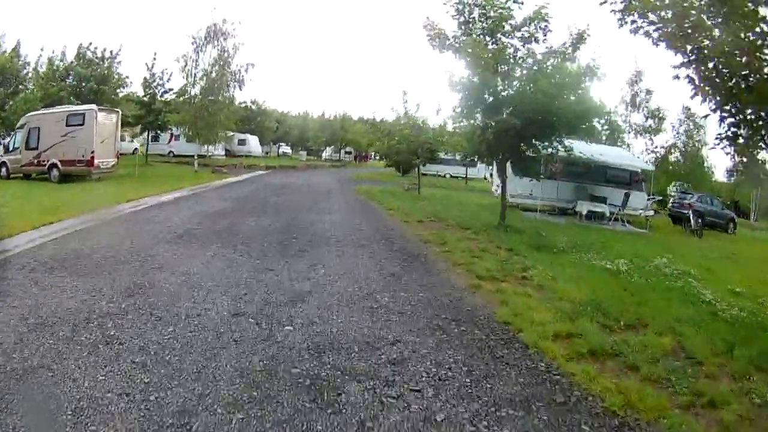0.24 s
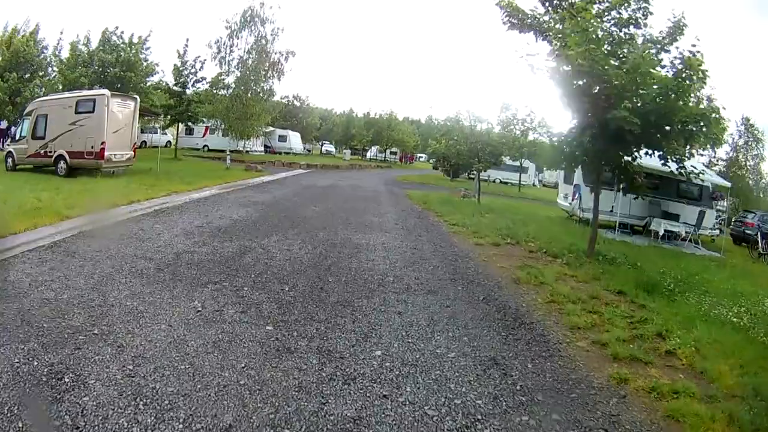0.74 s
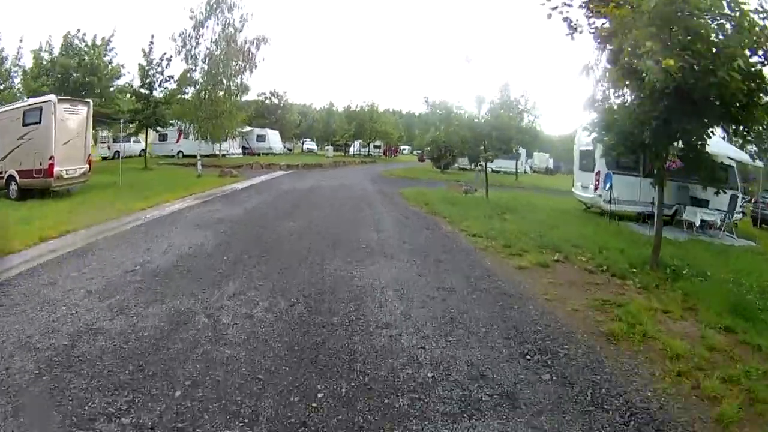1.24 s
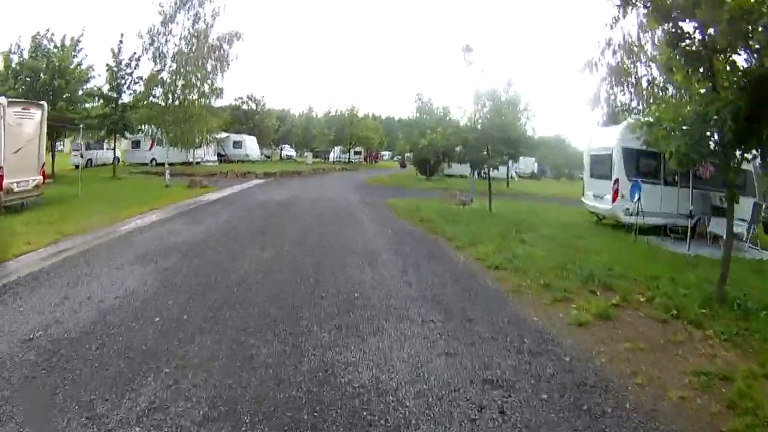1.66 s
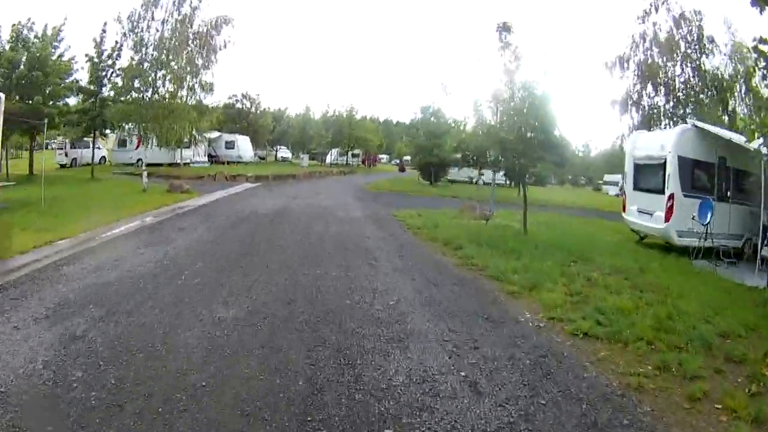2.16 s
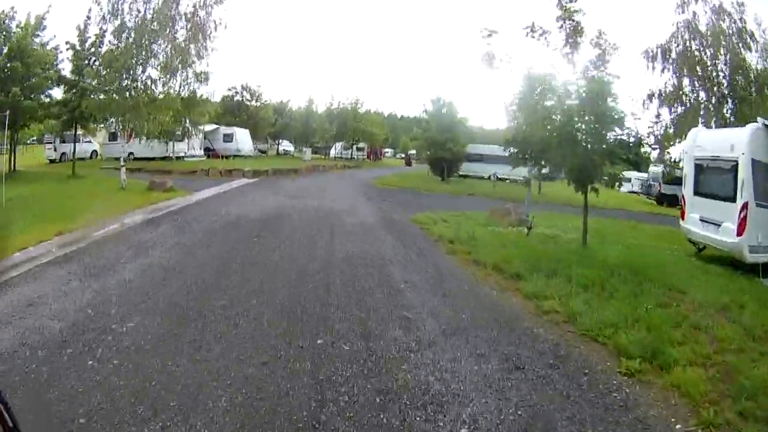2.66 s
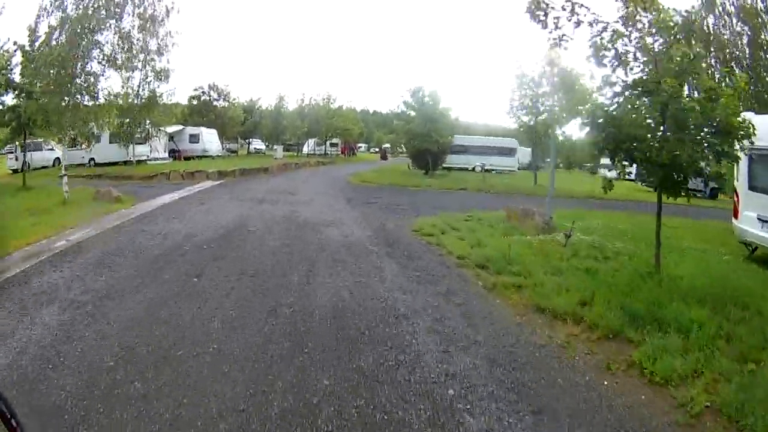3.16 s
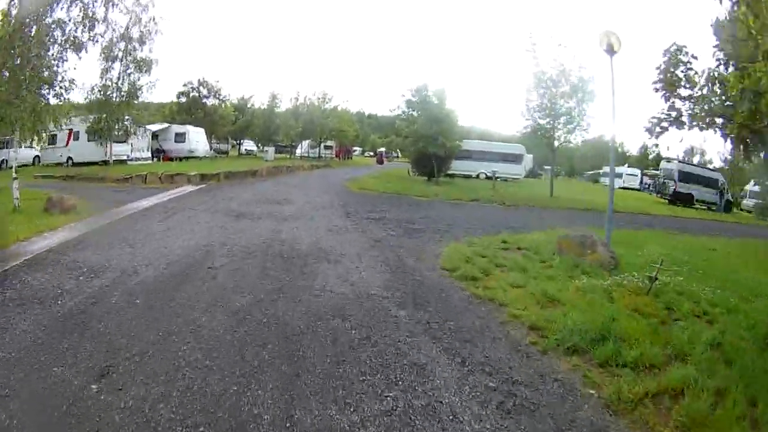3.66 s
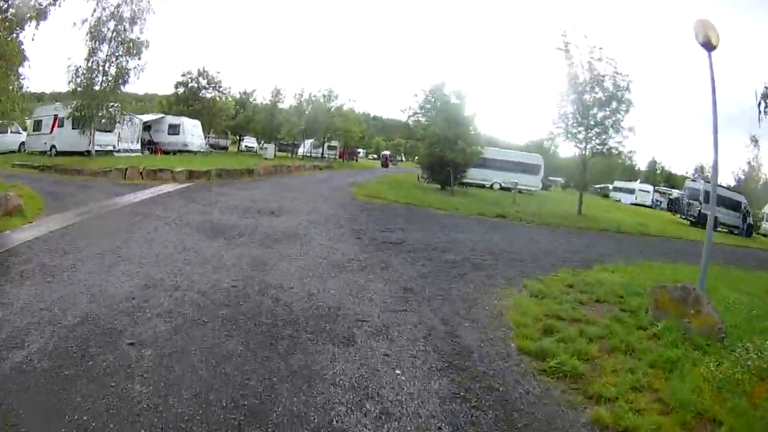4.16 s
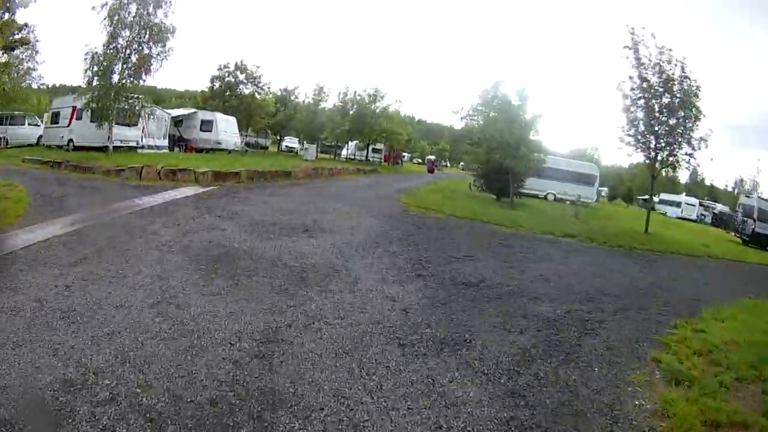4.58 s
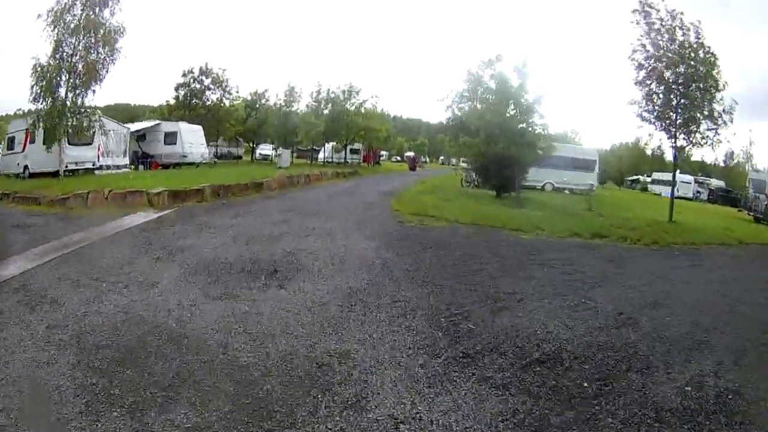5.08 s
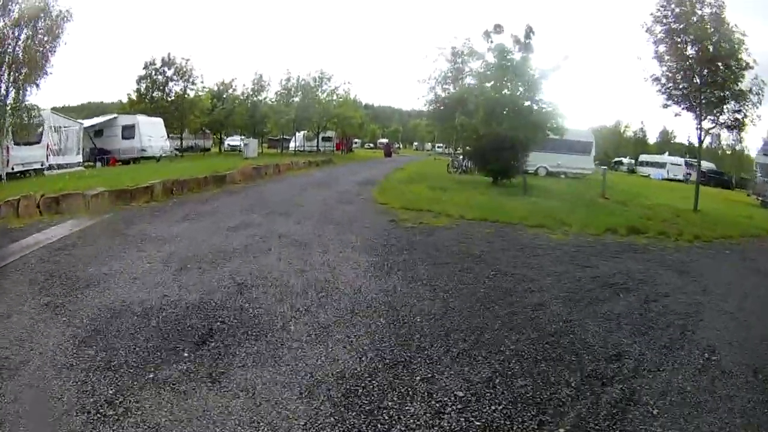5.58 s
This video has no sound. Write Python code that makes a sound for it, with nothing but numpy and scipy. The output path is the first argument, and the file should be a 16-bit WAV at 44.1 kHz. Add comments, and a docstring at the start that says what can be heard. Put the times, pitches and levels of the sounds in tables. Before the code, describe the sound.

Close, boxy rattling and knocking over a muffled gravel crunch as a bike rides along, with occasional stone pings and deep shuddering.

```python
"""A bicycle rolls along gravel for 5.8 s, heard through its frame by a camera in a closed housing on the handlebar.
From the start the tyres crunch as a dull, ringing rush (random grains through frame resonances), over a 31 Hz
flutter of the shaken camera (a bent sine) and faint hiss. Almost at once a stone pings (a scuff ringing the
wheel), as others do now and then. The mount's play ticks and knocks (short blows ringing the housing), densely
until about 2.9 s, sparsely up to 4.8 s, then densely again to the end."""
import sys
import numpy as np
from scipy.fft import rfft, irfft, next_fast_len
from scipy.io import wavfile
from scipy.ndimage import uniform_filter1d, map_coordinates

SR = 44100
rng = np.random.default_rng(int(sys.argv[2]) if len(sys.argv) > 2 else 0)


def waveform_to_disk(signal):
    """Save audio, clipped to [-1, 1], as 16-bit WAV at the path in sys.argv[1]."""
    frames = np.transpose(np.atleast_2d(signal))
    scaled = np.clip(frames, -1, 1) * 32767
    samples = np.round(scaled).astype(np.int16)
    wavfile.write(sys.argv[1], SR, samples)


N = 257103

SHAKE_HZ = 31.17  # nominal rate of the camera's swing
HARD_KNOCK_DB = 9.5  # reference strength for how dull a knock is and how strongly the other stop ticks


def amp(db):
    """Decibels to gain."""
    return 10 ** (np.asarray(db) / 20)


def unit(x):
    """x at rms 1."""
    return x / np.sqrt(np.mean(x ** 2) + 1e-20)


def along(points, hz):
    """(Hz, value) points read on a log frequency axis."""
    f, v = np.transpose(points)
    return np.interp(np.log(hz + 1), np.log(f), v)


def curves(rows):
    """One value per sample for each column after the time."""
    s, *cols = np.transpose(rows)
    return [np.interp(np.arange(N) / SR, s, c) for c in cols]


def wobble(rate):
    """A smooth random curve, rate knots a second."""
    knots = rng.standard_normal(int(N * rate / SR) + 4)
    return map_coordinates(knots, [np.arange(N) * rate / SR])


def filtered(x, response):
    """x times a response of frequency."""
    m = next_fast_len(len(x) + SR // 4)
    hz = np.fft.rfftfreq(m, 1 / SR)
    return irfft(rfft(x, m) * response(hz), m)[:len(x)]


def noise(spectrum):
    """Noise of rms 1 with the given colour."""
    return unit(filtered(rng.standard_normal(N), lambda hz: amp(along(spectrum, hz))))


def resonances(modes, hz):
    """Gain of a body whose resonances add in power; each falls to half amplitude at the edges of its width."""
    power = 0
    for centre, width, db in modes:
        power = power + (amp(db) / (1 + (2 * (hz - centre) / width) ** 2)) ** 2
    return np.sqrt(power)


def above(hz, edge_hz):
    """A smooth step from 0 below the edge to 1 above it."""
    return 1 - 1 / (1 + (hz / edge_hz) ** 4)


def add(track, s, sound):
    """Mix a sound into the track at time s."""
    start = max(round(s * SR), 0)
    track[start:start + len(sound)] += sound[:max(N - start, 0)]


def crunch(grain_rate, spread_db):
    """Countless small stones cracking under the tread at random, a few louder than the rest."""
    hit = rng.random(N) < grain_rate / SR
    loudness = amp(spread_db * np.minimum(rng.exponential(size=N), 4))
    return unit(hit * rng.standard_normal(N) * loudness)


def tyres(crunch_db, rumble_db, split_hz):
    """Gravel grains ring the frame; its low rumble and its higher crunch swell separately."""
    # tyres on the ground, before trims: t/s, crunch/dB, rumble/dB
    road = [(0, -41, -30.5), (.12, -40, -36), (.42, -41, -33.5), (.85, -40, -37.5), (1.05, -39, -34),
            (1.2, -37.5, -37.5), (1.45, -39, -35), (1.8, -37.5, -37.5), (1.95, -40.5, -41.5),
            (2.4, -37.7, -33), (2.56, -40.5, -37.5), (2.95, -40, -36.5), (3.5, -39, -38),
            (4.12, -39, -34.5), (4.53, -40, -38.5), (4.8, -37, -34), (5.05, -39.5, -33.5),
            (5.35, -37.5, -37), (5.83, -38, -32.5)]
    # resonances on the way from the tyres through frame and housing: f/Hz, width/Hz, level/dB
    frame_modes = [(253, 210, -7.5), (393.4, 106, 2), (464, 110, -9), (759, 130, -9.5), (974, 240, -14.5),
                   (1230, 310, -17), (1574, 174, -6), (1819, 233, -8.5), (2012, 166, -14), (2224, 190, -22),
                   (3440, 640, -36.5), (4150, 260, -40.5)]
    high_db, low_db = curves(road)
    grains = crunch(grain_rate=2500, spread_db=3.0) + 0.86 * rng.standard_normal(N)
    high = unit(filtered(grains, lambda hz: resonances(frame_modes, hz) * above(hz, split_hz)))
    low = unit(filtered(grains, lambda hz: resonances(frame_modes, hz) * (1 - above(hz, split_hz))))
    high_gain = amp(high_db + crunch_db + 1.36 * wobble(22.01))
    low_gain = amp(low_db + rumble_db + 1.6 * wobble(13))
    return high_gain * high + low_gain * low


def knocks():
    """Every knock of every bump as (s, energy dB, brightness dB, swing dB); harder ones are duller."""
    # bumps that throw the mount against its stop once a swing, before trims: t/s, knocks, gap/s,
    # first knock/dB, change over the run/dB, brightness/dB, extra swing/dB
    bumps = [(0.0821, 3, 0.036, 11.5, -3.5, 1, 1), (.231, 2, 0.032, 11.3, -4.5, -0.2, -2),
             (0.379, 3, 0.037, 9, -0.5, -.8, -0.5), (.537, 3, 0.034, 6.5, 2.5, -0.5, 1),
             (.8326, 3, 0.032, 10.5, -3.5, 2, -1.5), (.935, 1, 0, 9.3, -1, -1.5, 1),
             (1.0544, 2, 0.033, 9.5, 2.6, 2, 1), (1.1234, 2, .0303, 12.5, -.5, .4, -.5),
             (1.2096, 1, 0, 1, 0, 0.5, 5), (1.2466, 2, 0.032, 11.5, -3.5, -.3, 0),
             (1.3925, 1, 0, 8.5, 0, -2.5, -2.5), (1.4724, 2, 0.039, 10, 2.5, 0.1, -1),
             (1.5383, 1, 0, -.9, 0, -5, 1), (1.5777, 3, 0.032, 8.5, 5.5, 2, 0.6),
             (1.6782, 2, 0.034, 11, -3, 1, 0.5), (1.7856, 1, 0, 7.5, 0, 1.3, -.5),
             (1.8403, 2, 0.032, 9, -7.5, 2.5, 0), (1.977, 1, 0, 8.5, 0, -1.5, -2.5),
             (2.085, 2, 0.031, -6.5, 8, 1, 7.5), (2.174, 2, 0.034, 13.1, -5, 0.3, -1.5),
             (2.2475, 2, 0.037, 5.5, -2, 0.5, 1), (2.3487, 3, 0.04, 9, 3, 1.3, 0),
             (2.4612, 2, 0.034, 10, -1, 2, -2), (2.5313, 3, .0365, 10, 3.7, 2.2, -1),
             (2.6419, 3, 0.035, 11, -2, 1.5, -0.5), (2.7397, 1, 0, 1.5, 0, .6, 0),
             (2.777, 2, 0.034, 1, -0.2, -0.8, 4), (2.9072, 1, 0, 5, 0, 0.5, -0.5),
             (3.1807, 2, 0.034, 8.5, -11.5, 1.3, 1), (3.9897, 1, 0, 10, 0, -1, 0),
             (4.1121, 1, 0, 2, 1, -4, -1), (4.2301, 2, .0313, 9, 1.5, 1.6, -1),
             (4.3142, 1, 0, 5, 0, 2.5, -1), (4.8143, 1, 0, 9.5, 0, 3, -4.5),
             (4.873, 2, .0405, 13, -1.2, -0.7, 0), (4.9498, 2, .028, 12.5, -12, 0.5, 0),
             (5.0484, 1, 0, 5.2, -1, 3.3, 1.5), (5.134, 3, 0.033, 11.5, -4.5, 1.5, 0),
             (5.2419, 1, 0, 11.5, 0, -1, -2.5), (5.301, 1, 0, 8.6, 0, 2.4, -1),
             (5.3356, 2, .0312, 12.8, -1.8, -2.2, -1), (5.4294, 3, 0.031, 11, -9, -.9, -1.4),
             (5.5523, 1, 0, 11, 0, .8, 0), (5.6228, 1, 0, 9.5, 0, -2, -2), (5.7853, 1, 0, 5, 0, -.8, -1.5)]
    arch_db = 1.5  # a run of three or more swells by this much in its middle
    dulling = .28  # dB of brightness lost per dB of knock
    rows = []
    for s, count, gap_s, first_db, change_db, bright_db, extra_db in bumps:
        for k, u in enumerate(np.linspace(0, 1, round(count))):
            db = first_db + change_db * u + arch_db * np.sin(np.pi * u)
            dulled_db = bright_db - dulling * (db - HARD_KNOCK_DB)
            rows.append((s + k * gap_s, db, dulled_db, db + extra_db))
    return rows


def swing_width(surge_db, tremble_db):
    """The swing builds up to each knock or sway and dies away after it, over a trembling that rises and falls."""
    # trembling of the camera between bumps, before its trim: t/s, level/dB
    tremble = [(0, -25), (.8, -25), (1.6, -23), (2.02, -26), (2.15, -20), (2.8, -23), (3.4, -28.5),
               (3.6, -26.5), (3.72, -34.5), (3.9, -24.5), (4.6, -27.5), (5.2, -23), (5.7, -27.5),
               (5.83, -16.5)]
    # gentler bumps that only rock the camera: t/s, swing/dB
    sways = [(.3, -17.5), (.68, -21.5), (2.94, -17), (3.04, -20), (3.28, -17), (3.85, -24.5), (3.94, -20),
             (4.16, -22), (4.365, -16), (4.45, -22), (4.79, -14)]
    rise_s, fall_s = 0.025, 0.029  # time constants before and after a bump
    t = np.arange(N) / SR
    power = amp(curves(tremble)[0] + tremble_db) ** 2
    surges = [(s, swing_db + surge_db) for s, _, _, swing_db in knocks()]
    for s, db in surges + sways:
        near = slice(max(round(s * SR) - SR // 4, 0), round(s * SR) + SR // 4)
        envelope = np.exp(np.minimum((t[near] - s) / rise_s, (s - t[near]) / fall_s))
        power[near] += (amp(db) * envelope) ** 2
    return np.sqrt(uniform_filter1d(power, size=700))


def shake(level, lag, skew, hang, squareness, jolt_db):
    """The camera swings on its mount, a whole number of times from one knock to the next; narrow swings wander."""
    # colour of the soft jolts in the frame, growing with the swing: f/Hz, level per Hz/dB
    jolts = [(20, -7.5), (50, 4.5), (90, -4.5), (150, -3), (200, -8), (270, -9), (400, -20.5), (700, -58),
             (2000, -120)]
    wide_swing_db = -20  # swings wider than this are bent by the stops and keep steadier time
    t = np.arange(N) / SR
    hits = np.r_[-1 / SHAKE_HZ, np.transpose(knocks())[0], N / SR + 1 / SHAKE_HZ]
    swings = np.r_[0, np.cumsum(np.round(np.diff(hits) * SHAKE_HZ))]
    wide = level ** 2 / (level ** 2 + amp(wide_swing_db) ** 2)
    wander = .025 * wobble(30) + 0.17 * (1 - wide) ** 2 * wobble(18)
    angle = 2 * np.pi * (np.interp(t, hits, swings) - lag + wander)  # lag and wander in cycles
    # a wide swing hangs at the top, springs back faster than it sinks and is flattened by the stops
    shape = wide * (skew * np.sin(2 * angle) + hang * np.cos(2 * angle)) - np.sin(angle)
    swing = np.tanh((shape + 0.2 * wobble(60)) * (0.094 + squareness * level))
    # even out the strength over about two swings, so that level alone sets the width
    swing /= np.sqrt(np.abs(uniform_filter1d(swing ** 2, size=2900)) + 1e-6)
    return level * (amp(1.8 * wobble(40)) * swing + amp(jolt_db) * noise(jolts))


def stones(ring_db, snap_db, snap_t60):
    """A stone squeezed from under a tyre scuffs out sideways and sets the wheel ringing."""
    # stones, before trims: t/s, level/dB, sharpness/dB, ring t60/s
    pebbles = [(0.045, -13, -30, 0.055), (0.1747, -25.5, -36, 0.12), (1.332, -28, -35.5, .1),
               (1.741, -23, -28, 0.056), (2.3212, -21, -24.5, 0.13), (3.0188, -28.5, -14, 0.048),
               (3.5733, -19, -33, 0.16), (3.635, -32, -13, .1), (3.689, -39.5, -18.5, 0.053),
               (3.863, -33, -16.5, .1), (4.005, -26, -33, 0.11), (4.166, -23, -8, 0.11),
               (5.055, -23.5, -32, .15), (5.685, -24.5, -35, 0.13)]
    # ring of the wheel after a stone: f/Hz, width/Hz, level/dB
    wheel_modes = [(416, 130, 1), (910, 220, -6.5), (1240, 380, -11.5), (1608, 200, 0), (1860, 200, -11.5)]
    # snap of the stone itself: f/Hz, width/Hz, level/dB
    snap_modes = [(1900, 500, 2), (3270, 530, -1), (3950, 400, -6)]
    out, t = np.zeros(N), np.arange(SR // 4) / SR

    def scuff(modes):
        """Noise of rms 1 through a body's resonances."""
        return unit(filtered(rng.standard_normal(len(t)), lambda hz: resonances(modes, hz)))

    for s, db, sharp_db, t60 in pebbles:
        ring = amp(ring_db - 60 * t / t60) * scuff(wheel_modes)
        snap = amp(sharp_db + snap_db - 60 * t / snap_t60) * scuff(snap_modes)
        onset = 1 - np.exp(-t / 0.001)
        add(out, s, amp(db) * (ring + snap) * onset)
    return out


def blow(modes, bright_db, scatter_db, detune, bounce_s, rebound, rough, size=2048):
    """One contact of energy 1; each excites the resonances a little differently."""
    hz, t = np.fft.rfftfreq(size, 1 / SR), np.arange(size) / SR
    chance = rng.standard_normal((len(modes), 2))
    varied = []
    for (f, width, db), (a, b) in zip(modes, chance):
        varied.append((f * (1 + detune * a), width, db + scatter_db * b))
    gain = resonances(varied, hz) * amp(bright_db * above(hz, 1800))
    # the causal (minimum-phase) response: a sudden start, then the ring
    cepstrum = irfft(np.log(gain + 1e-9))
    cepstrum[1:size // 2] *= 2
    cepstrum[size // 2 + 1:] = 0
    # the contact chatters in quick, dying bounces (an allpass) that spread the click without colouring it
    delay = np.exp(-2j * np.pi * hz * bounce_s * np.exp(.15 * rng.standard_normal()))
    bounces = (rebound + delay) / (1 + rebound * delay)
    # the rough plastic scrapes for a few milliseconds as it lands
    scrape = rng.standard_normal(size) * amp(-60 * t / .012)
    treble = (1j * hz / (700 + 1j * hz)) ** 2
    contact = bounces + rough * treble * rfft(scrape / np.linalg.norm(scrape))
    fade_out = np.hanning(2 * size)[size:]
    ring = irfft(np.exp(rfft(cepstrum)) * contact) * fade_out
    return ring / np.linalg.norm(ring)


def rattle(knock_db, tick_db):
    """The loose mount strikes its two stops, pushing the housing in opposite directions."""
    # resonances of the housing struck at the main stop: f/Hz, width/Hz, level/dB
    knock_modes = [(145, 200, -5.5), (419.5, 241, 2), (622, 220, -8), (828, 374, -11.5), (1360, 390, -21.5),
                   (1931, 220, -13.5), (2177, 360, -22), (2840, 310, -28.5), (3220, 350, -30.5),
                   (3983, 370, -25), (4647, 350, -30), (5560, 750, -35.5), (6270, 630, -40),
                   (7350, 170, -52.5), (9120, 830, -54.5), (10500, 300, -65.5)]
    # resonances of the housing struck at the other stop: f/Hz, width/Hz, level/dB
    tick_modes = [(218, 240, -4.5), (563, 140, -2), (920, 550, -6.5), (1410, 990, -15), (2090, 610, -16),
                  (3100, 872, -24.5), (4200, 1000, -32), (5370, 670, -41), (6889, 550, -54.5),
                  (9630, 2400, -63.5)]
    swing_share, dull_share = .35, .5  # wide swings and dull, full knocks reach the other stop sooner
    tick_grows = 1.4  # dB of tick per dB of excess
    base_lead_s, lead_s_per_db = .0089, .0003  # the tick comes before the knock, earlier on a wider swing
    run_gap_s = .043  # knocks closer than this belong to one run
    lead_per_gap = .5  # within a run a slower swing puts the tick earlier too
    out, last_s = np.zeros(N), -1
    for s, db, bright_db, swing_db in knocks():
        knock = blow(knock_modes, bright_db, scatter_db=1.25, detune=0.013,
                     bounce_s=0.0004466, rebound=0.7, rough=0.28)
        add(out, s, -amp(db + knock_db) * knock)
        excess_db = db + swing_share * (swing_db - db) - dull_share * bright_db - HARD_KNOCK_DB
        slow_s = s - last_s - 1 / SHAKE_HZ if s - last_s < run_gap_s else 0
        lead_s = base_lead_s + lead_s_per_db * excess_db + lead_per_gap * slow_s
        tick = blow(tick_modes, 0, scatter_db=1.5, detune=.015, bounce_s=.0011, rebound=0.5, rough=0.46)
        reach = np.clip(2 + excess_db, 0, 1)  # no tick below -2 dB of excess, full from -1 dB
        add(out, s - lead_s, reach * amp(tick_db + tick_grows * excess_db) * tick)
        last_s = s
    return out


def scene():
    """Everything reaches the microphone through the mount."""
    width = swing_width(surge_db=-23.0, tremble_db=1.5)
    ground = tyres(crunch_db=-0.5, rumble_db=-1.0, split_hz=694)
    ground += stones(ring_db=-3.0, snap_db=-0.5, snap_t60=0.041)
    mount = shake(width, lag=0.058, skew=0.51, hang=0.31, squareness=3.8, jolt_db=-11.5)
    mount += rattle(knock_db=0.4, tick_db=-2.5)
    return (mount + ground)[None]


def record(dry):
    """The camera drops the deepest bass, adds faint hiss, rounds off the highest peaks and has a band limit."""
    # colour of the camera's own hiss: f/Hz, level per Hz/dB
    hiss = [(100, -2.5), (4500, -2.5), (7000, -11), (15000, -12.5)]
    top_hz = 15800
    x = filtered(dry[0], lambda hz: above(hz, edge_hz=15)) + amp(-74.5) * noise(hiss)
    x = x / (1 + np.abs(x / .98) ** 8) ** (1 / 8)
    fade_in = np.minimum(np.arange(N) / (.002 * SR), 1)
    return filtered(x * fade_in, lambda hz: hz < top_hz)[None]


dry = scene()
out = record(dry)
waveform_to_disk(out)
```